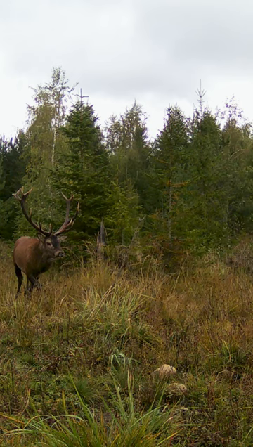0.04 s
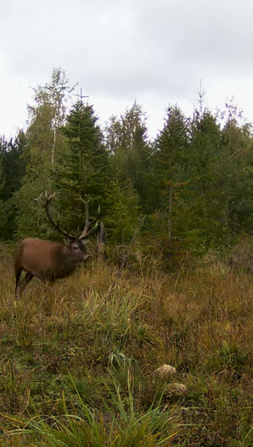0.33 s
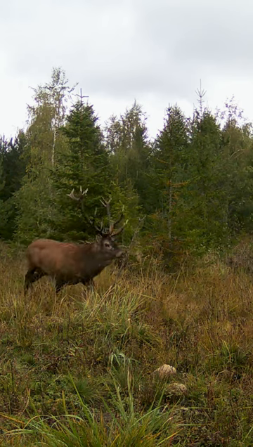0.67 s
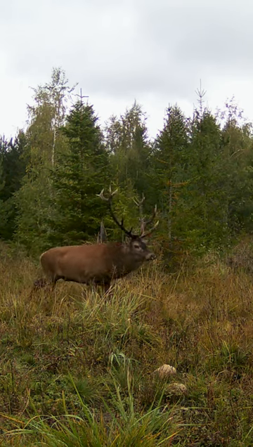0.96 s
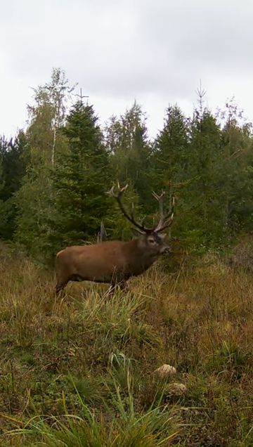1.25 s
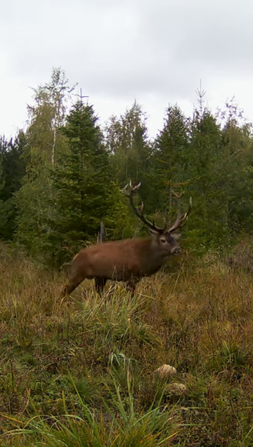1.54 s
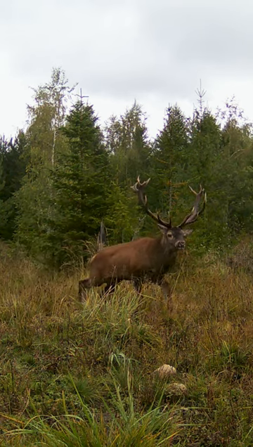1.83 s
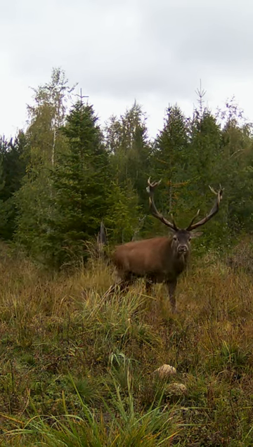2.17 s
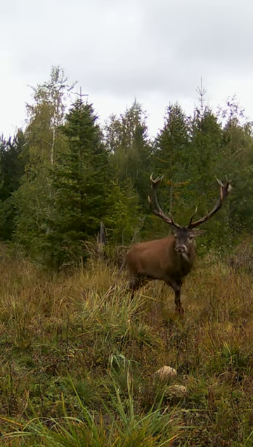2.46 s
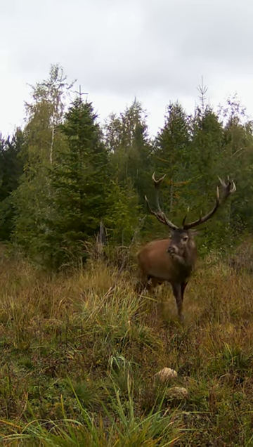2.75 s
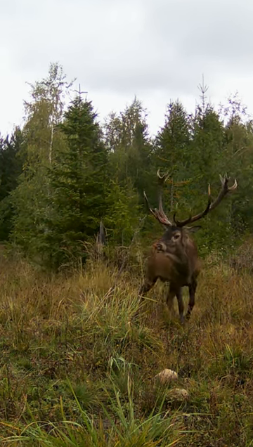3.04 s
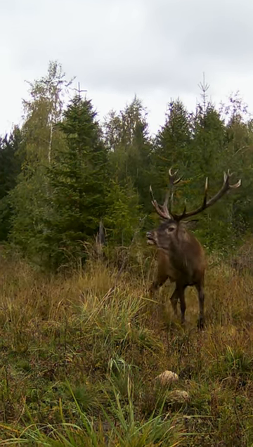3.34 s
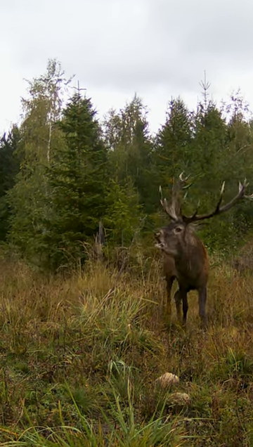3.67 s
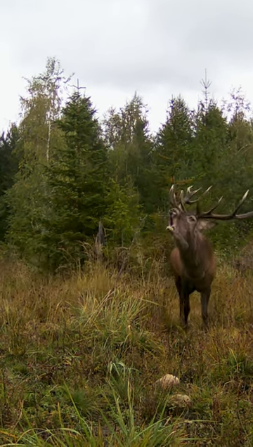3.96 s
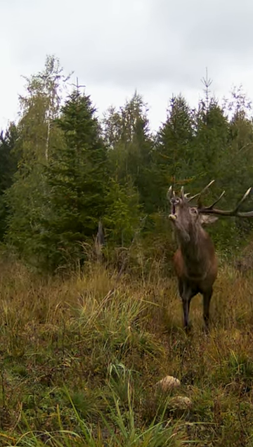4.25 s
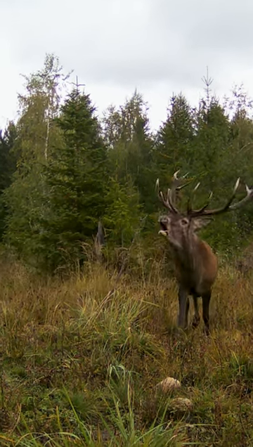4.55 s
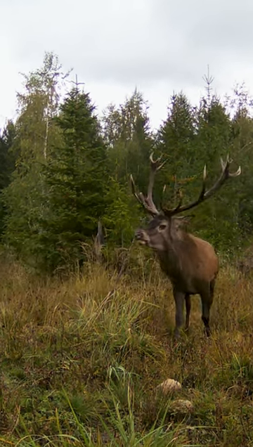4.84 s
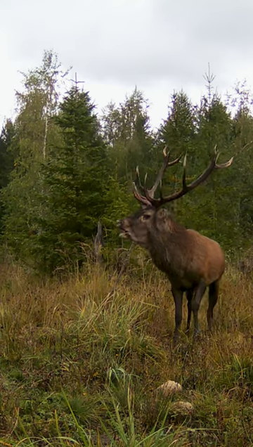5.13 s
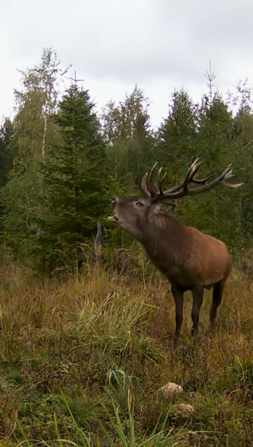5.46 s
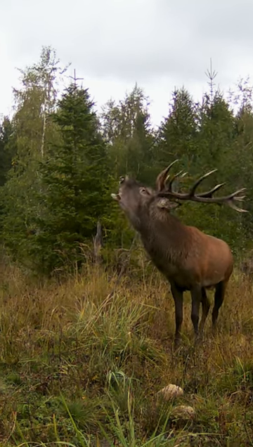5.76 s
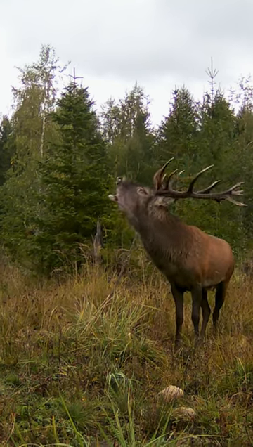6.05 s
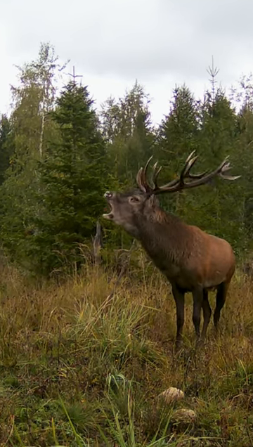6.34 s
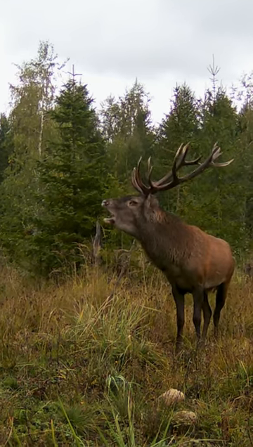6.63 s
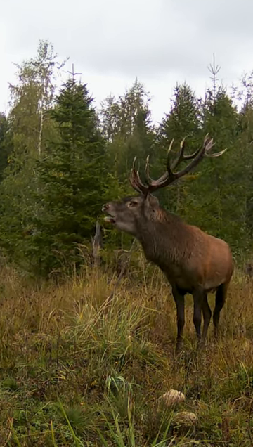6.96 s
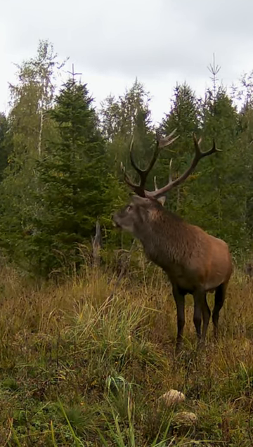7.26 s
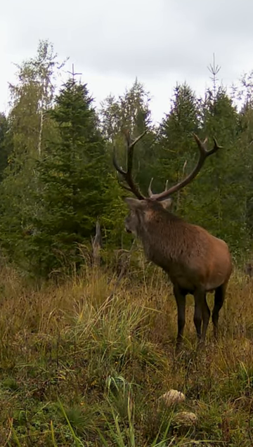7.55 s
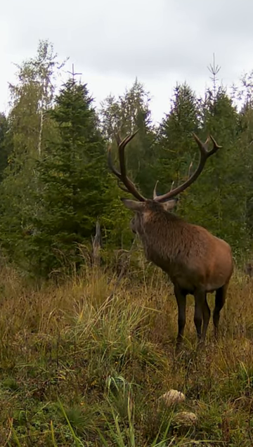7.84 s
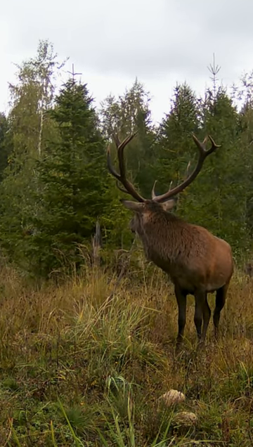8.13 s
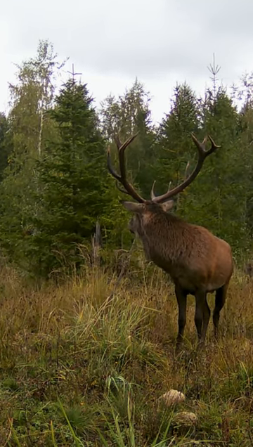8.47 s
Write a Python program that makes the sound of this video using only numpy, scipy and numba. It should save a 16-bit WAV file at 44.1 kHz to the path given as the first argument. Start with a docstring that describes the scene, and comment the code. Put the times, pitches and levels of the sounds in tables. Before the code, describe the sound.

A red deer stag groans, roars twice and grunts close by in a quiet forest clearing, over a faint breeze.

```python
"""A forest clearing in quiet air, one microphone, a red deer stag close by. He steps in through dry
grass, groans, roars twice and ends with a soft grunt. His vocal folds pulse through a long throat whose
resonances sink as he draws the larynx down; in the roars a second, slower vibration joins in or the
folds rattle. Farther off the trees answer faintly and a breeze moves in their tops."""
import sys
import numpy as np
from scipy import signal
from scipy.fft import rfft, irfft, next_fast_len
from scipy.io import wavfile
from scipy.ndimage import uniform_filter1d
from numba import njit

SR = 44100
rng = np.random.default_rng(int(sys.argv[2]) if len(sys.argv) > 2 else 0)


def file_out(sig):
    """Save sig as 16-bit WAV at sys.argv[1]."""
    # one column per channel
    cols = np.atleast_2d(sig).T
    # limit, then scale
    lim = np.clip(cols, -1, 1)
    pcm = np.round(lim * 32767).astype(np.int16)
    wavfile.write(sys.argv[1], SR, pcm)


N = 374850
TIME_S = np.arange(N) / SR

# the tone each part of the voice sends to the microphone: freq_hz, gain_db
CHEST_TONE = [(30, -51), (70, -4), (110, -8), (170, 3), (200, 4), (430, 0.5), (540, -13), (680, -42.5),
              (1000, -100)]
MOUTH_TONE = [(250, -86.5), (450, -10), (600, 13.5), (1900, -0.5), (2200, -19.5), (2600, -54), (3500, -100)]
RASP_TONE = [(1400, -67), (1950, 2), (2250, 8), (2850, 0), (3250, -5), (3600, -16), (4300, -20),
             (5000, -44), (6000, -28.5), (8000, -20)]
TEETH_TONE = [(4500, -37.5), (5300, -25.5), (5600, 4.5), (6100, 3.5), (6600, -1.5), (8000, -19)]
NECK_TONE = [(50, -28.5), (75, -7), (95, 3), (155, -1.5), (240, -25.5), (500, -66.5)]

def stag(sputter_db=2, hum_db=8, hum_limit_db=-54, taut_db=-41, slack_range_db=7):
    """The voice, close by, leaves through chest and mouth; when it is rough its upper part sputters."""
    rough = roughness()
    pitch, (chest_gain, mouth_gain, rasp_gain) = effort()
    chest_db = 20 * np.log10(chest_gain + 1e-9)
    slack = np.clip((taut_db - chest_db) / slack_range_db, 0, 1)  # the throat tightens with effort
    cycles = fold_cycles(pitch, rough)
    source = folds(cycles, rough) + second_vibration(FLAPPING_1) + second_vibration(FLAPPING_2)
    voice = throat(source, slack)
    sputter = sputter_db * rough * wobble(45)
    chest = chest_gain * levelled(coloured(voice, CHEST_TONE))
    mouth = mouth_gain * amp(.5 * sputter) * levelled(coloured(voice, MOUTH_TONE))
    rasp = rasp_gain * amp(sputter) * levelled(coloured(voice, RASP_TONE))
    # a strong, rasping flow also hisses past the teeth
    sizzle = rasp_gain * chest_gain * amp(-2) * noise(TEETH_TONE)
    # the neck wall hums with the folds: it leads in soft calls and is capped in the roars
    hum_gain = np.minimum(chest_gain * amp(hum_db), amp(hum_limit_db)) * (1 - rough)
    hum = hum_gain * levelled(coloured(pulses(cycles), NECK_TONE))
    return hum + chest + mouth + rasp + sizzle


# the two roars: start_s, end_s, attack_s, release_s
ROAR_SPANS = [(3.741, 4.748, 0.013, 0.043), (5.136, 6.607, .045, .035)]
# fold rate in each roar, rising with the push and sagging as it runs out: time_s, pitch_hz
ROAR_PITCH_1 = [(3.74, 105.4), (3.88, 110.2), (3.95, 122.8), (4.06, 149.5), (4.2, 156.8), (4.37, 136),
                (4.465, 99.1), (4.55, 98.2), (4.74, 63.27)]
ROAR_PITCH_2 = [(5.15, 90.5), (5.23, 110.3), (5.34, 118.7), (5.5, 135.3), (5.619, 161.9), (5.75, 147.3),
                (6.021, 149), (6.15, 137), (6.26, 131.9), (6.451, 130.4), (6.531, 124.4), (6.598, 104.1)]
# strength of the three bands in each roar: time_s, chest_db, mouth_db, rasp_db
ROAR_LEVELS_1 = [(3.76, -45, -44, -54), (3.868, -42, -42.5, -51.5), (3.89, -40.5, -44, -48.5),
                 (4.126, -35.5, -41, -57.5), (4.262, -29.5, -41, -45.5), (4.36, -26.5, -46.5, -47.5),
                 (4.408, -25.5, -50.5, -59), (4.476, -27, -57, -66.5), (4.554, -27.5, -53.5, -70),
                 (4.614, -33, -51.5, -63.5), (4.706, -28.5, -55, -72), (4.72, -28, -52, -64)]
ROAR_LEVELS_2 = [(5.17, -54.5, -59, -90), (5.216, -53, -46, -59), (5.388, -41, -39.5, -49.5),
                 (5.556, -40, -41, -48), (5.646, -35, -47, -59.5), (5.696, -34, -42.5, -46),
                 (5.728, -35, -46.5, -55.5), (5.826, -30.5, -46.5, -53), (6.038, -41, -50.5, -53),
                 (6.166, -37, -51, -47), (6.198, -35, -45, -53.5), (6.268, -39.5, -46, -56.5),
                 (6.486, -36, -41.5, -57), (6.558, -29, -47, -63), (6.575, -34, -43.5, -62)]
# opening groan and closing grunt: start_s, end_s, rise_s, fall_s, top_pitch_hz, base_level_db
GROAN_AND_GRUNT = [(3.24, 3.765, .48, .01, 105, -53), (7.43, 7.888, .135, .125, 78.06, -56.5)]
# chest, mouth and rasp in those soft calls: offset_db, loss_at_rest_db
SOFT_CALL_BANDS = [(-3.5, 14.5), (-4, 20.3), (-18.5, 24)]

def effort(soft_sag=.18, soft_bend=2.5):
    """Fold rate and band gains. In a soft call, pushing raises pitch, level and brightness together."""
    roaring = sum(gate(*roar) for roar in ROAR_SPANS)
    pitch, = curves(ROAR_PITCH_1 + ROAR_PITCH_2)
    gains = roaring * amp(curves(ROAR_LEVELS_1 + ROAR_LEVELS_2))
    for start, end, rise, fall, top_hz, db in GROAN_AND_GRUNT:
        push = gate(start, end, rise, fall)
        sounding = gate(start, end, 0.026, 0.018)
        band_db = [db + offset - loss * (1 - push) for offset, loss in SOFT_CALL_BANDS]
        gains = gains + sounding * amp(band_db)
        soft_pitch = top_hz * (1 - soft_sag * (1 - push ** soft_bend))
        pitch = np.where((sounding > 0) & (roaring == 0), soft_pitch, pitch)
    return pitch, gains


# where the voice turns hoarse or rattles: start_s, end_s, roughness_share
HOARSE_SPELLS = [(3.713, 4.13, 0.21), (4.05, 4.5, .33), (4.424, 4.796, 0.62), (5.359, 5.663, 0.19),
                 (5.648, 6.036, .74), (5.95, 6.167, .4), (6.52, 6.646, 0.41)]

def roughness(calm=.06, fade_s=.05):
    """The folds run almost clean, except in the hoarse spells."""
    spells = [depth * gate(start, end, fade_s, fade_s) for start, end, depth in HOARSE_SPELLS]
    return np.clip(np.max(spells, axis=0), calm, 1)


def fold_cycles(pitch, rough, jitter=.07):
    """Running count of vocal fold cycles; roughness unsettles their timing."""
    return np.cumsum(pitch * (1 + jitter * rough * wobble(170))) / SR


def folds(cycles, rough, shimmer_db=5):
    """Fold pulses of uneven size and the bright puff of air that each lets through."""
    beats = pulses(cycles) * amp(shimmer_db * rough * wobble(140))
    breath = noise([(100, -2.5), (600, -1), (2500, 7.5), (8000, 8.5), (12000, -24)])
    puffs = unit(breath * np.exp(-2.5 * (cycles % 1)))
    return (1 - rough) * beats + rough * puffs


# loose tissue sounding beside the folds in each roar: time_s, pitch_hz, gain_db
FLAPPING_1 = [(3.9, 58, 0), (4.1, 85.44, -7), (4.2, 93.06, -2.5), (4.38, 99.04, 1.5), (4.55, 96.73, 14),
              (4.72, 64.47, 4)]
FLAPPING_2 = [(5.69, 84.2, -10.5), (5.82, 90, -15), (5.95, 86.17, -18.5)]

def second_vibration(course, waver=0.0041, fade_s=0.043):
    """Loose tissue flaps at a slower rate of its own, in soft, dull pulses."""
    hz, db = curves(course)
    flaps = pulses(np.cumsum(hz * (1 + waver * wobble(60))) / SR)
    dulled = coloured(flaps, [(95, 8), (200, 0), (300, -7), (420, -8.5), (650, -11.5), (2000, -20.5)])
    sounding = gate(course[0][0] - fade_s / 2, course[-1][0] + 2 * fade_s, fade_s, fade_s)
    return amp(db) * sounding * dulled


# pulls of the larynx down the neck: halfway_s, time_scale_s, let_go_s
LARYNX_DROPS = [(3.876, .11, 4.95), (5.469, 0.078, 7.8)]

def larynx():
    """How far the larynx is drawn down, 0-1: it glides down in an S and springs back when let go."""
    return sum((TIME_S < let_go) / (1 + np.exp((halfway - TIME_S) / scale))
               for halfway, scale, let_go in LARYNX_DROPS)


# the throat's resonances: larynx_up_hz, larynx_down_hz, open_jaw_adds_hz, width_hz, gain_db
FORMANTS = [(269, 190, 180, 50.7, 11.5), (920, 325, 75, 57.5, 5.5), (1300, 706, 133, 49, 2.5),
            (1600, 888, 28, 68, 3.5), (1833, 1232, 300, 51, 5), (2190, 1535, 150, 80, 4.5),
            (2480, 1848, 560, 74, 2), (2895, 2430, 400, 66, 5.5), (3225, 2740, 540, 35, 3)]
# jaw and lips through each roar, the last pose held for the grunt: time_s, jaw_open_share, cavity_hz
MOUTH_POSES_1 = [(3.3, 0, 1720), (3.75, 0.11, 1725), (3.9, 0.53, 1985), (4.02, .45, 1820),
                 (4.15, 0.18, 1590), (4.3, 0.11, 1600), (4.5, 0.09, 1240)]
MOUTH_POSES_2 = [(5.2, 0.075, 1530), (5.321, .15, 1445), (5.409, 0.66, 808), (5.48, 0.78, 665.5),
                 (5.55, 0.48, 1740), (5.722, .12, 1510), (6.0, 0.098, 1455), (6.2, 0.28, 1155),
                 (6.4, 0.98, 920), (6.6, 0.77, 935), (7.4, 0.083, 1490)]

def throat(source, slack, leak_db=-34, cavity_db=7, cavity_width_hz=300, taut_quiver=0.015):
    """Nine resonances sink with the larynx and rise with the jaw; the mouth cavity lifts one region."""
    radians = 2 * np.pi / SR
    widening = 1 + .9 * slack  # slack walls damp the ringing
    drop = larynx()
    jaw, cavity_hz = curves(MOUTH_POSES_1 + MOUTH_POSES_2)
    voice = amp(leak_db) * source
    for up, down, opened, width, db in FORMANTS:
        quiver = 1 + taut_quiver * (1 - slack) * wobble(25)
        hz = (up + (down - up) * drop + opened * jaw) * quiver
        voice = voice + amp(db) * resonate(source, radians * hz, radians * width * widening)
    cavity = resonate(voice, radians * cavity_hz, radians * cavity_width_hz * widening)
    return voice + amp(cavity_db) * cavity


# his steps near the microphone: start_s, level_db (before gain_db)
FOOTFALLS = [(0.653, -65), (1.373, -60), (1.49, -59), (2.426, -50.5)]
# a hoof in dry grass: freq_hz, gain_db
CRUNCH_TONE = [(60, 4), (220, 9.5), (700, -2.5), (1700, -5), (3000, -53), (5000, -68), (8000, -62)]

def hooves(t60_s=0.07, gain_db=-3):
    """Each step in the grass is a short, dull crunch."""
    blows = sum(amp(db - 60 * np.abs(TIME_S - start) / t60_s) * (TIME_S >= start)
                for start, db in FOOTFALLS)
    return amp(gain_db) * blows * noise(CRUNCH_TONE)


# how long the trees around the clearing ring: freq_hz, t60_s
ECHO_DECAY = [(100, 0.64), (400, 0.32), (1500, 1.33), (3000, 0.78), (8000, 0.097)]

def forest(near, build_s=0.035):
    """Scattered echoes come back from the trees, each frequency dying at its own speed."""
    hz, t, scatter = signal.stft(rng.standard_normal(SR), SR, nperseg=256)
    decay = amp(-60 * t / along(ECHO_DECAY, hz)[:, None])
    onset = 1 - np.exp(-t / build_s)
    _, tail = signal.istft(scatter * decay * onset, SR, nperseg=256)
    echo = signal.fftconvolve(near, tail / np.linalg.norm(tail))[:N]
    return coloured(echo, [(200, -30), (500, -28.5), (1400, -23.5), (3000, -19.5)])


# the quiet of the clearing: freq_hz, gain_db
AIR_TONE = [(12, -22.5), (20, -9.5), (43, 2), (118, -9), (231, -28), (287, -26), (349, -15.5), (463, -21),
            (669, -21), (779, -21.5), (906, -21.5), (989, -23), (2300, -28), (3550, -37), (4620, -52),
            (7810, -120)]

def air(level_db=-66):
    """Open air all around the microphone, a low rush that drifts slightly in level."""
    return amp(level_db + 0.86 * wobble(0.69)) * noise(AIR_TONE)


# the breeze easing and returning: time_s, level_db (before gain_db)
BREEZE_SWELL = [(0, -66), (1.5, -70), (5, -68.5), (7, -65), (8.5, -66.5)]
# the treetops as heard from the clearing: freq_hz, gain_db
TREETOP_TONE = [(80, -10.5), (170, -6), (330, -7), (430, -20), (700, -31.5), (2000, -42)]

def breeze(gain_db=-2):
    """Wind in far treetops, dull and slightly fluttering."""
    swell_db, = curves(BREEZE_SWELL)
    return amp(swell_db + gain_db + 0.58 * wobble(16)) * noise(TREETOP_TONE)


# the microphone's own hiss: freq_hz, gain_db
HISS_TONE = [(3000, -36), (4800, -23), (6000, -6.5), (7000, 5.5), (8100, -9)]

def microphone_noise(buffet_db=-70, hiss_db=-89):
    """Air buffets the microphone softly, under a thin, steady hiss."""
    buffeting = amp(buffet_db + 0.83 * wobble(21))
    rumble = noise([(10, -10.5), (36, 0), (70, -14), (200, -38), (1000, -82.5)])
    return buffeting * rumble + amp(hiss_db) * noise(HISS_TONE)


def amp(db):
    """Decibels to gain."""
    return 10 ** (np.asarray(db) / 20)


def unit(x):
    """x at rms 1."""
    return x / np.sqrt(np.mean(x ** 2) + 1e-20)


def along(points, hz):
    """Read (freq_hz, value) points along a log frequency axis."""
    freqs, values = np.transpose(points)
    return np.interp(np.log(hz + 1), np.log(freqs + 1), values)


def curves(rows):
    """One value per sample for each column after the time."""
    times, *columns = np.transpose(rows)
    return [np.interp(TIME_S, times, column) for column in columns]


def gate(start, end, attack, release):
    """Straight attack, hold and release between 0 and 1."""
    return np.clip(np.minimum((TIME_S - start) / attack, (end - TIME_S) / release), 0, 1)


def wobble(rate):
    """A smooth random curve, rate knots a second."""
    return np.interp(TIME_S * rate, np.arange(N), rng.standard_normal(N))


def coloured(x, points):
    """x through a causal filter with the (freq_hz, gain_db) points."""
    size = 2 * next_fast_len(N // 2 + 8192)
    gains = amp(along(points, np.fft.rfftfreq(size, 1 / SR)))
    cepstrum = irfft(np.log(gains))
    cepstrum[1:size // 2] *= 2  # fold onto positive time for minimum phase
    cepstrum[size // 2 + 1:] = 0
    return irfft(rfft(x, size) * np.exp(rfft(cepstrum)))[:N]


def noise(points):
    """Coloured noise of rms 1."""
    return unit(coloured(rng.standard_normal(N), points))


def levelled(x, size=1500):
    """x with its slow swells taken out, at rms 1."""
    power = uniform_filter1d(uniform_filter1d(x * x, size), size)
    return x / np.sqrt(np.abs(power) + 1e-6 * np.mean(x * x))


def pulses(cycles):
    """One click, placed between samples, each time the cycle count passes a whole number."""
    at = np.interp(np.arange(1, int(cycles[-1])), cycles, np.arange(N))
    i = at.astype(int)
    return unit(np.bincount(i, 1 - (at - i), N) + np.bincount(i + 1, at - i, N))


@njit
def resonate(x, turn, damping):
    """A moving resonance; turn and damping in radians a sample."""
    y, band, low = np.zeros(len(x)), 0.0, 0.0
    for n in range(len(x)):
        low += turn[n] * band
        band += damping[n] * (x[n] - band) - turn[n] * low
        y[n] = band
    return y


def scene():
    """One microphone: the stag and his steps in front, the forest's answer and the air behind."""
    near = stag() + hooves()
    return (near + forest(near) + air() + breeze() + microphone_noise())[None]


def record(dry, start_s=.057, top_hz=8100):
    """A moment of silence before the sound begins; the recorder keeps nothing above its band limit."""
    running = TIME_S > start_s
    in_band = np.fft.rfftfreq(N, 1 / SR) < top_hz
    return irfft(rfft(dry * running) * in_band, N)


dry = scene()
out = record(dry)
file_out(out)
```